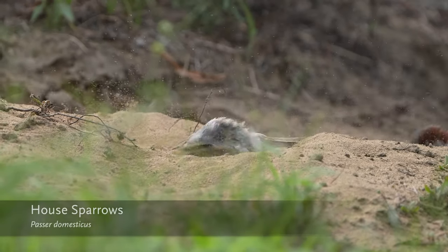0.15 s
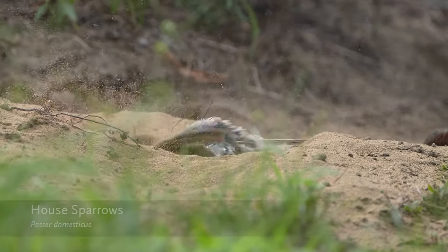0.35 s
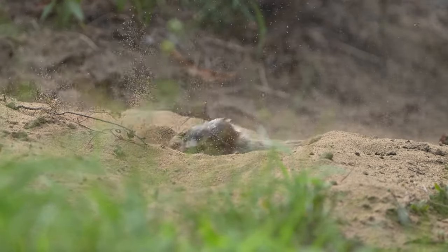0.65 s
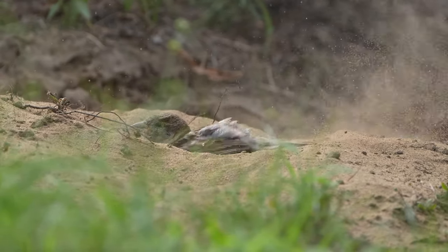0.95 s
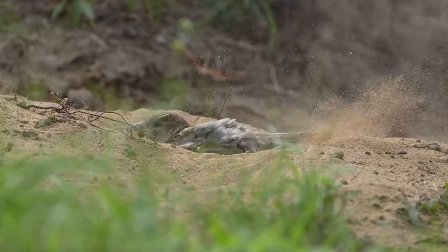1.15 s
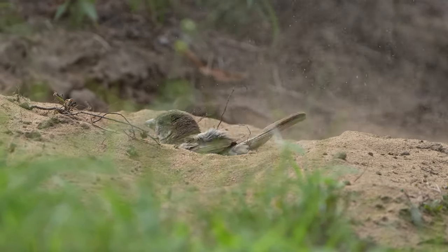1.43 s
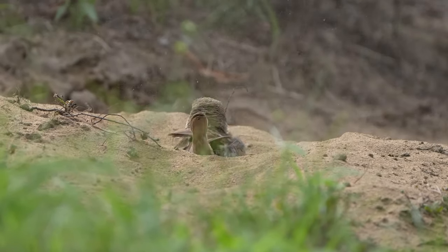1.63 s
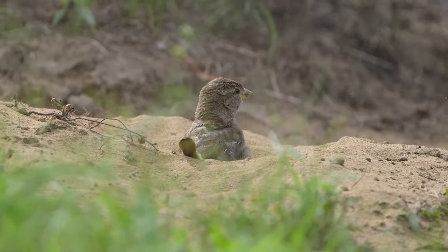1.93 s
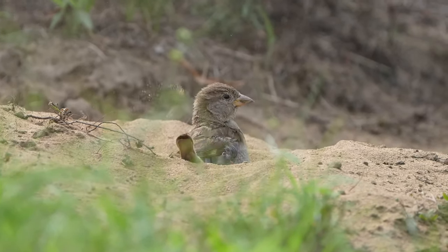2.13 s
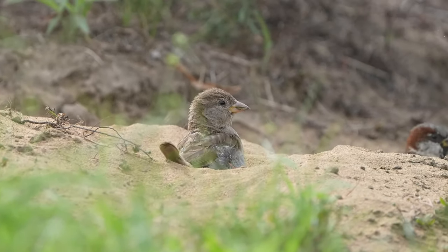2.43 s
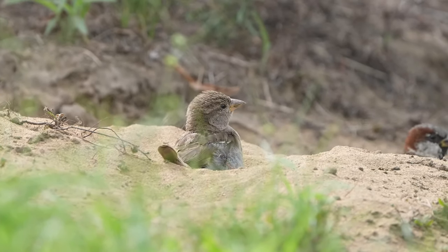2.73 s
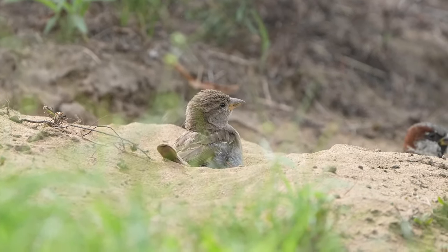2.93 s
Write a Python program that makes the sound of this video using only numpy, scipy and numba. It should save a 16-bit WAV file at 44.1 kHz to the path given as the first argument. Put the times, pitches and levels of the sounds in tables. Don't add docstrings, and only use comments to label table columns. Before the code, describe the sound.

A nearby sparrow scolds four times in the first second, raspy with a light echo. Weaker birds whistle and trill afterward, grit clicks, soft soil thuds come later, with insects, leaves and far engine drone outdoors.

```python
import sys
import numpy as np
from scipy import signal
from scipy.fft import rfft, irfft
from scipy.io import wavfile
from scipy.ndimage import uniform_filter1d
from numba import njit

SR = 44100
rng = np.random.default_rng(int(sys.argv[2]) if len(sys.argv) > 2 else 0)


def int16_out(signal):
    q = np.round(np.clip(np.atleast_2d(signal).T, -1, 1) * 32767)
    wavfile.write(sys.argv[1], SR, q.astype(np.int16))


def attenuation_scalar(level_db):
    decades = np.asarray(level_db, float) / 20
    return 10 ** decades


N = 135828
T = np.arange(N) / SR


def level(x, db):
    return x * attenuation_scalar(db) / np.sqrt(np.mean(x ** 2))


@njit
def svf(x, hz, width):
    y, b, l = np.empty(len(x)), 0., 0.
    for i in range(len(x)):
        g, k = np.tan(np.pi * hz[i] / SR), width / hz[i]
        v = (b + g * (x[i] - l)) / (1 + g * (g + k))
        b, l, y[i] = 2 * v - b, l + 2 * g * v, k * v
    return y


def band(x, hz, width):
    hz = np.clip(hz + np.zeros(len(x)), 20, .45 * SR)
    once = svf(x, hz, 1. * width)
    return svf(once, hz, 1. * width)


def curve(rows, col=1):
    rows = np.array(rows)
    return np.interp(T, rows[:, 0], rows[:, col])


def walk(rate, size=N):
    k = int(SR / rate)
    steps = np.repeat(rng.standard_normal(size // k + 1), k)
    smooth = uniform_filter1d(uniform_filter1d(steps, k), k)[:size]
    return smooth / .7


def phase(hz):
    return 2 * np.pi * np.cumsum(hz) / SR


def pan(x, db):
    return x * attenuation_scalar(np.array([[db], [-db]]) / 2)


def gate(start, length, edge):
    return np.clip(np.minimum(T - start, start + length - T) / edge, 0, 1)


def hiss(shape, flicker_db):
    alike_hz = 1150
    f, s = np.fft.rfftfreq(N, 1 / SR) + 1, np.array(shape)
    gain = attenuation_scalar(np.interp(np.log(f), np.log(s[:, 0]), s[:, 1], left=-60, right=-60))
    mid, side = rfft(rng.standard_normal((2, N))) * gain
    side = side * f / np.hypot(f, alike_hz)
    both = np.array([mid + side, mid - side])
    out = 0
    for k in range(20):
        share = np.clip(1 - abs(2 * np.log2(f / 20) - k), 0, 1)
        out = out + irfft(both * share, N) * attenuation_scalar(flicker_db * walk(5.98))
    return level(out, 0)


# (frequency [Hz], spectral level [dB per Hz])
TOWN_SPECTRUM = [(20, -16), (53, -4.5), (81, -14), (119, -6.5), (319, -14.5), (480, -23), (938, -20),
                 (1700, -34)]
TOWN_DB, TOWN_PAN_DB = -47, 1.6


def town():
    rumble = hiss(TOWN_SPECTRUM, 0.46) * attenuation_scalar(TOWN_DB)
    lows = signal.sosfilt(signal.butter(2, 200, fs=SR, output="sos"), rumble)
    return lows + pan(rumble - lows, TOWN_PAN_DB)


# (frequency [Hz], spectral level [dB per Hz])
AIR_SPECTRUM = [(1500, 1), (2500, 7.5), (5000, 1), (6500, -4), (9400, -15), (12000, -17), (15900, -11)]
AIR_FLOOR_DB = -56


def open_air():
    return hiss(AIR_SPECTRUM, 0.84) * attenuation_scalar(AIR_FLOOR_DB)


# (time [s], level [dB])
LEAF_SWELL = [
    (0, -58.5),
    (1.2, -58.5),
    (1.75, -57),
    (1.9, -52),
    (2.4, -54.5),
    (3.08, -51),
]
# (frequency [Hz], spectral level [dB per Hz])
LEAF_SPECTRUM = [(1500, -0.5), (4000, -5), (9500, -4.5), (13000, -6), (16000, -5)]


def leaves():
    return hiss(LEAF_SPECTRUM, 1.2) * attenuation_scalar(curve(LEAF_SWELL))


# (time [s], level [dB])
CRICKET_LEVEL = [(0, -51.5), (1.1, -50.5), (2.2, -49), (3.08, -49)]
CRICKET_HZ, CRICKET_WIDTH_HZ = 7780, 850
CRICKET_RATE_HZ, CRICKET_DEPTH, CRICKET_PAN_DB = 26.9, 0.31, -3.5


def crickets():
    beat = phase(CRICKET_RATE_HZ * (1 + 0.0155 * walk(3.1)))
    strokes = 0.48 * np.cos(beat) + 0.33 * np.cos(2 * beat) + 0.4 * np.cos(3 * beat)
    throb = 1 + CRICKET_DEPTH * strokes
    edges = [CRICKET_HZ - CRICKET_WIDTH_HZ * 0.64, CRICKET_HZ + CRICKET_WIDTH_HZ * 0.54]
    wings = signal.butter(3, edges, "band", fs=SR, output="sos")
    shared = rng.standard_normal(N)
    ears = []
    for _ in range(2):
        scrape = (0.24 * shared + rng.standard_normal(N)) * throb
        ears.append(signal.sosfilt(wings, scrape))
    chorus = level(np.array(ears), 0) * attenuation_scalar(curve(CRICKET_LEVEL) + 0.12 * walk(4.55))
    return pan(chorus, CRICKET_PAN_DB)


# (frequency [Hz], wander [Hz], level [dB], throb [dB])
ENGINE_LINES = [(75.6, 1.64, -43.5, 0.46), (120.2, 6.02, -52, 3.5), (38, 1.4, -59.5, 4),
                (247.7, 3.02, -63, 3), (67.2, 0.9, -66, 3), (85.6, 1.67, -56.5, 6), (160.5, 8, -55, -1),
                (189.5, 6, -57.5, 1)]


def drone():
    out = 0
    for hz, wander, db, throb in ENGINE_LINES:
        line = np.sin(phase(hz + wander * walk(8)))
        out = out + np.sqrt(2) * attenuation_scalar(db + throb * walk(14)) * line
    return out


HOLD_HZ, DROP_S = 4970, 0.00493
CLEAR_S, RASP_IN_S = 0.015, .006
ATTACK_S, RELEASE_S, SAG_DB = .0025, .014, -3
WOBBLE_HZ, WOBBLE_RATE_HZ, PATCHY_DB = 220, 350, 2.5
RASP_HZ, RASP_JITTER, RASP_SCATTER_DB, BREATH = 480, .5, 2.5, 1.1
LOW_START_HZ, LOW_END_HZ, LOW_WIDTH_HZ, LOW_DB = 3300, 2700, 1300, -1
AIR_HZ, AIR_WIDTH_HZ, AIR_POWER = 9600, 15000, 1.15
# (frequency [Hz], width [Hz], level [dB])
THROAT_MODES = [(4900, 590, 6), (3950, 820, 1), (6000, 280, 2.5), (7920, 1800, 1.5)]


def scold(calls, air_db, clear_db, spread_db):
    out = np.zeros(N)
    n = int(.15 * SR)
    t = T[:n]
    for start, db, length, onset_hz in calls:
        chance = rng.standard_normal((4, n))
        release = np.exp(-np.clip(t - length, 0, 1) / RELEASE_S)
        env = np.clip(t / ATTACK_S, 0, 1) * attenuation_scalar(SAG_DB * t / length) * release
        glide = (onset_hz - HOLD_HZ) * np.exp(-(t / DROP_S) ** 1.53)
        wobble = WOBBLE_HZ * walk(WOBBLE_RATE_HZ, size=n) * np.clip(t / CLEAR_S, 0, 1)
        hz = HOLD_HZ + glide + wobble

        clear = np.exp(-(t / CLEAR_S) ** 2)
        tone = attenuation_scalar(clear_db + PATCHY_DB * walk(270, size=n)) * clear * np.sin(phase(hz))

        pulses = np.zeros(n)
        at = np.cumsum(SR / RASP_HZ * np.exp(RASP_JITTER * chance[0])).astype(int)
        at = at[at < n]
        pulses[at] = attenuation_scalar(RASP_SCATTER_DB * chance[1, :len(at)])
        drive = level(pulses, 0) + BREATH * chance[2]
        rasp = 0
        for k, (mode_hz, width, mode_db) in enumerate(THROAT_MODES):
            ring = band(drive, mode_hz * hz / HOLD_HZ, width)
            ring = level(ring, mode_db + (k > 0) * spread_db) * attenuation_scalar(PATCHY_DB * walk(149, size=n))
            rasp = rasp + (-1) ** k * ring

        low_hz = LOW_END_HZ + (LOW_START_HZ - LOW_END_HZ) * np.exp(-2 * t / length)
        low = level(band(drive, low_hz, LOW_WIDTH_HZ), LOW_DB + spread_db)
        beak = np.clip(t / length, 0, 1) ** AIR_POWER
        air = level(band(chance[3], AIR_HZ, AIR_WIDTH_HZ), air_db) * beak
        rasp_in = 1 - np.exp(-(t / RASP_IN_S) ** 2)
        i = int(start * SR)
        out[i:i + n] += attenuation_scalar(db) * env * (tone + rasp_in * (rasp + air + low) / 2)
    return out


# (time [s], level [dB], length [s], onset pitch [Hz])
FAR_CALLS = [(.004, -49, 0.027, 5520), (0, -53.5, 0.023, 4240), (.958, -63, 0.034, 4950),
             (1.045, -62, .04, 5230), (1.174, -50, 0.013, 5240), (1.263, -54.5, 0.038, 4900),
             (1.365, -56.5, 0.05, 5130), (1.478, -56, 0.057, 4900), (1.626, -51, 0.022, 5460),
             (1.715, -66, .035, 5030), (2.70, -56, 0.04, 5750), (2.812, -53, 0.018, 5370)]


def far_scolds():
    return scold(FAR_CALLS, air_db=-25, clear_db=3, spread_db=-6.5)


# (time [s], pitch [Hz], level [dB])
WHISTLE_NOTES = [
    [(.895, 1937, -57), (.915, 2350, -52), (.936, 2900, -51)],
    [(.905, 2350, -60), (.92, 2750, -51), (.932, 3050, -55)],
    [(.93, 3450, -60), (.94, 3900, -56), (.954, 4280, -63), (.968, 3950, -58), (.983, 3480, -51.5),
     (1.0, 3400, -59), (1.028, 2900, -62)],
    [(.975, 2950, -50), (.995, 2700, -68), (1.015, 2500, -53.5), (1.032, 2200, -59)],
    [(.222, 2950, -57), (.238, 3300, -58), (.252, 3470, -52), (.27, 3050, -55), (.284, 3250, -57)],
    [(.272, 2500, -51), (.29, 2530, -52), (.298, 2330, -61), (.312, 2200, -62)],
    [(.225, 1650, -60), (.25, 2650, -59)],
    [(.228, 3200, -58), (.24, 4500, -53), (.25, 5300, -55)],
    [(1.255, 2700, -78), (1.272, 3000, -62), (1.295, 3260, -60), (1.305, 3080, -56), (1.325, 3080, -66)],
    [(1.36, 3140, -62), (1.385, 3050, -61), (1.398, 3200, -64), (1.415, 3500, -62), (1.435, 3600, -61)],
    [(2.166, 2400, -47), (2.177, 1990, -49), (2.19, 2330, -48), (2.202, 2480, -44), (2.218, 3100, -53)],
    [(2.18, 2300, -60), (2.2, 2900, -52), (2.212, 3350, -56), (2.221, 3550, -53), (2.246, 3240, -61)],
    [(2.728, 3150, -64), (2.75, 3050, -62)],
]
OCTAVE_DB, OCTAVE_TOP_HZ, WHISTLE_FLUTTER_DB = -7.5, 4800, 2


def whistles():
    out = 0
    for rows in WHISTLE_NOTES:
        hz = uniform_filter1d(curve(rows), size=300) * (1 + .02 * walk(250))
        angle = phase(hz)
        start, end = rows[0][0], rows[-1][0]
        env = gate(start, end - start, 0.0023) * attenuation_scalar(curve(rows, col=2) + WHISTLE_FLUTTER_DB * walk(120))
        octave = attenuation_scalar(OCTAVE_DB) * np.exp(-((2 * hz - OCTAVE_TOP_HZ) / 600) ** 2)
        out = out + env * (np.sin(angle) + octave * np.sin(2 * angle))
    return out * np.sqrt(2)


# (time [s], length [s], centre pitch [Hz], level [dB], swing [fraction of pitch])
TRILL_PHRASES = [(0.372, 0.061, 2407, -50, 0.14), (1.094, 0.1, 2530, -54, 0.13),
                 (1.207, 0.053, 2530, -56, .14), (1.48, 0.091, 2437, -49.5, .14),
                 (1.58, 0.1, 2380, -58.5, 0.24), (1.692, .065, 2480, -55, 0.11),
                 (1.771, 0.11, 2782, -52.5, .19), (1.901, 0.043, 2600, -53, .23),
                 (1.953, 0.076, 1935, -58, 0.05), (2.029, 0.145, 2177, -57.5, .07),
                 (2.199, 0.062, 2050, -55, 0.09), (2.499, 0.1, 2395, -59.5, 0.13),
                 (2.611, 0.096, 2410, -57, 0.11), (2.71, 0.064, 2420, -61, 0.05)]
TRILL_RATE_HZ, EASY_SWING, SLOWING_HZ = 70, .14, 165
TRILL_LEAN, TRILL_UNEVEN, TRILL_FLUTTER_DB = .7, .02, 1.6


def trills():
    out, drift = 0, walk(25)
    for start, length, hz, db, swing in TRILL_PHRASES:
        on = T > start
        rate = TRILL_RATE_HZ - SLOWING_HZ * max(swing - EASY_SWING, 0)
        beat = phase(on * rate * (1 + TRILL_UNEVEN * drift))
        tone = np.sin(phase(hz * (1 + TRILL_UNEVEN * drift / 2 - swing * np.cos(beat))))
        swell = attenuation_scalar(db + 4 * (T - start - length / 2).clip(-1, 1) / length * on)
        out = out + gate(start, length, 0.0047) * swell * tone * (1 + TRILL_LEAN * np.sin(beat))
    return out * attenuation_scalar(TRILL_FLUTTER_DB * walk(44.6))


# (time [s], level [dB], length [s], onset pitch [Hz])
NEAR_CALLS = [
    (.418, -40, 0.055, 6470),
    (.513, -38, 0.046, 6230),
    (.616, -38.5, 0.052, 6200),
    (.742, -40, 0.051, 5240),
]


def near_scolds():
    return scold(NEAR_CALLS, air_db=7, clear_db=7, spread_db=0)


def knocks(rows):
    out = np.zeros(N)
    impulse = np.eye(1, 2000)[0] + 1e-18
    for start, db, hz, width in rows:
        ring = band(impulse, hz, width)
        i = int(start * SR)
        out[i:i + len(ring)] += ring * attenuation_scalar(db) / abs(ring).max()
    return out


# (time [s], level [dB], centre [Hz], width [Hz])
SOIL_BLOWS = [
    (.453, -33, 470, 132),
    (.626, -39.5, 470, 152),
    (.905, -61, 500, 300),
    (2.222, -37, 304, 151),
    (2.247, -41, 305, 150),
    (2.27, -36, 405, 125),
    (2.292, -36.5, 320, 200),
    (2.425, -37, 356, 157),
]


def thumps():
    return pan(knocks(SOIL_BLOWS), TOWN_PAN_DB)


# (time [s], level [dB], centre [Hz], width [Hz])
GRIT_BLOWS = [(.671, -23, 6130, 910), (.671, -30.5, 2800, 500), (1.124, -35, 11000, 8000),
              (1.424, -41, 11800, 6000), (1.866, -33.5, 3830, 2000), (1.866, -40, 11600, 6000),
              (1.906, -32.5, 11000, 8060), (2.51, -41, 11000, 6000), (2.753, -33.5, 3200, 500),
              (2.753, -38, 4230, 600), (2.753, -43, 2500, 500), (2.908, -32, 3970, 2500),
              (2.908, -41.5, 2720, 500), (2.907, -36, 12000, 4000)]


def ticks():
    return pan(knocks(GRIT_BLOWS), -4.3)


ECHO_T60_S, ECHO_GAP_S, ECHO_TOP_HZ = 0.49, 0.0031, 10000


def echo(x):
    t = T[:SR]
    decay = np.exp(-np.log(1000) * t / ECHO_T60_S) * np.clip(t / ECHO_GAP_S, 0, 1)
    tail = rng.standard_normal((2, SR)) * decay
    tail = signal.sosfilt(signal.butter(1, ECHO_TOP_HZ, fs=SR, output="sos"), tail)
    tail = tail / np.sqrt(np.sum(tail[0] ** 2))
    return signal.fftconvolve(x[None], tail, axes=1)[:, :N]


def scene():
    beds = town() + open_air() + leaves() + crickets() + drone()
    far, song, trill, near = far_scolds(), whistles(), trills(), near_scolds()
    birds = pan(near, -3) + pan(far + song + trill, -2)
    birds[0] = np.roll(birds[0], 1)
    wet = echo(attenuation_scalar(-5) * near + attenuation_scalar(-3) * far + attenuation_scalar(-20) * song + attenuation_scalar(-5) * trill)
    return birds + wet + beds + thumps() + ticks()


def band_limit(x):
    return signal.sosfilt(signal.butter(12, 15800, fs=SR, output="sos"), x)


def record(dry):
    return band_limit(dry)


dry = scene()
out = record(dry)
int16_out(out)
```